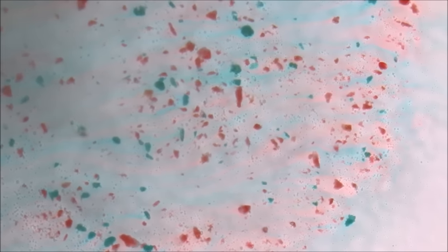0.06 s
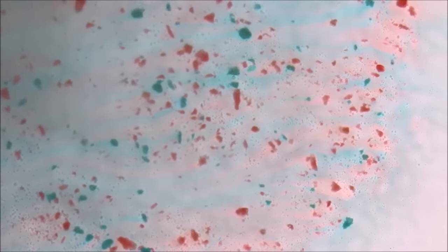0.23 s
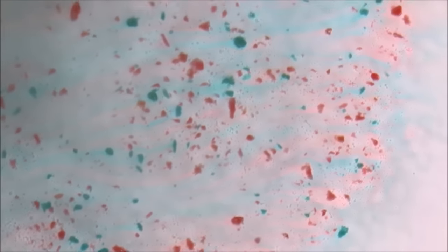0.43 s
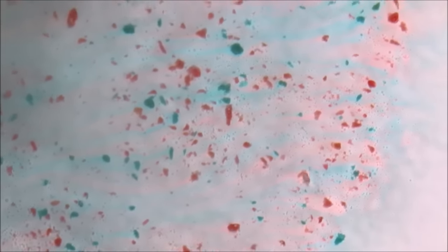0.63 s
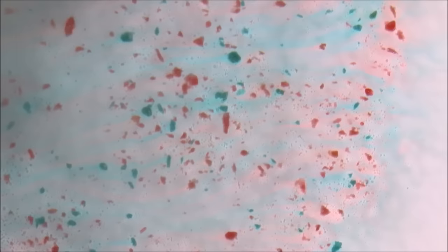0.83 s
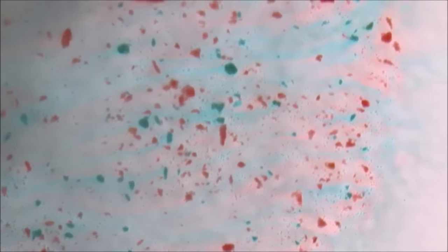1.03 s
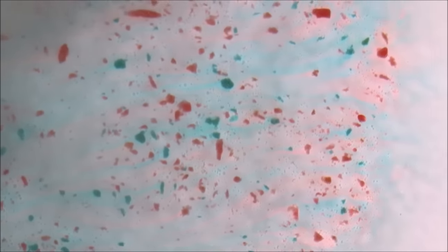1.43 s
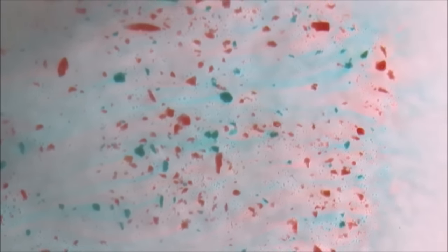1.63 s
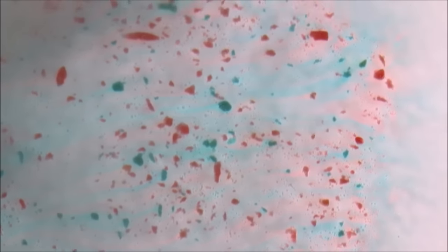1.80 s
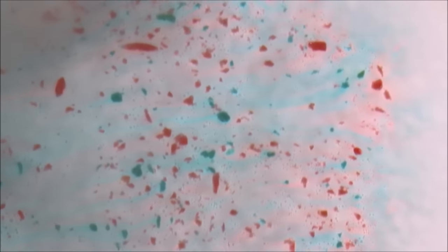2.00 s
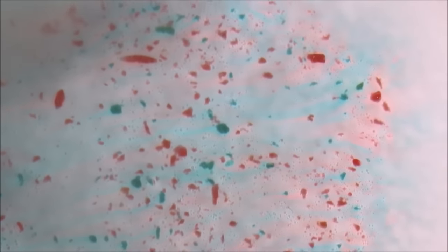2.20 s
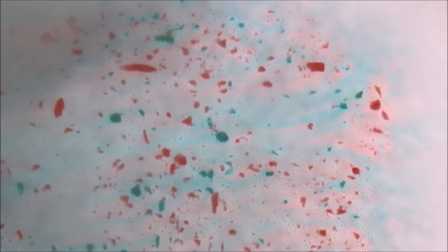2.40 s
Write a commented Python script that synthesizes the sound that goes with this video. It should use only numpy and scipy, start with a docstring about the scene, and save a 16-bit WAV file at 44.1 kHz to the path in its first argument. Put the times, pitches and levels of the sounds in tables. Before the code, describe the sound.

Granules crackle and pop as they dissolve in bath water, over a faint hiss.

```python
"""Crackling granules dissolve in a bathtub: each bursts with a snap and a brief ring of its freed gas
bubble. A few bursts are loud and close, many are small, and countless tiny pops make a fizz.
The tub walls throw every pop back at once and the tiled room rings on.
A faint hiss and a low hum lie underneath."""
import sys
import numpy as np
from scipy import signal
from scipy.fft import rfft, irfft, next_fast_len
from scipy.io import wavfile
from scipy.ndimage import map_coordinates

SR = 44100
rng = np.random.default_rng(int(sys.argv[2]) if len(sys.argv) > 2 else 0)


def dump(signal):
    """Clip the signal to [-1, 1] and save it as 16-bit WAV at the path in sys.argv[1]."""
    limited = np.clip(np.atleast_2d(signal).T, -1, 1)
    pcm = np.round(limited * 32767).astype(np.int16)
    wavfile.write(sys.argv[1], SR, pcm)


N = 112454
POP_SAMPLES = 16384  # room for one pop and its echoes
POP_HZ = np.fft.rfftfreq(POP_SAMPLES, 1 / SR)


def gain(db):
    """Turn decibels into a number to multiply by."""
    return 10 ** (np.asarray(db) / 20)


def unit(x):
    """Scale a sound to an average (rms) level of 1."""
    return x / np.sqrt(np.mean(x ** 2) + 1e-20)


def read_curve(points, hz):
    """Read between a table's rows, with frequency spaced in octaves."""
    row_hz, values = np.transpose(points)
    return np.interp(np.log(hz + 1), np.log(row_hz + 1), values)


# How alike left and right sound (1 = the same, 0 = unrelated): frequency_hz, likeness
EAR_LIKENESS = [(60, .95), (180, 0.65), (700, 0.65), (1400, 0.62), (2800, 0.073), (6000, 0.04),
                (14000, 0.026)]

def stereo(pair, hz):
    """Blend two unrelated spectra into left and right: alike in the bass, apart in the treble."""
    angle = np.arccos(read_curve(EAR_LIKENESS, hz)) / 2
    shared, apart = pair[0] * np.cos(angle), pair[1] * np.sin(angle)
    return np.array([shared + apart, shared - apart])


# Tone of the background hiss: frequency_hz, relative_level_db
HISS_TONE = [(25, -16.5), (45, 3), (60, 8.5), (110, 4), (140, 0), (250, -0.5), (500, -7), (1000, -6.5),
             (2000, -1.5), (4000, -5), (8000, -16), (16000, -22.5)]

def hiss(level_db=-49.5):
    """Steady, faint noise with some rumble at the bottom."""
    hz = np.fft.rfftfreq(N, 1 / SR)
    noise = stereo(rfft(rng.standard_normal((2, N))), hz)
    return gain(level_db) * unit(irfft(noise * gain(read_curve(HISS_TONE, hz)), N))


# The low tones of the hum: pitch_hz, level_db
HUM_TONES = [(57, -69.5), (86.5, -65), (108.5, -61.5), (167, -68)]

def hum(waver_depth=0.29, wavers_per_s=11):
    """A few low tones, each wavering at random in loudness and pitch."""
    t = np.arange(N) / SR
    out = np.zeros(N)
    for pitch_hz, level_db in HUM_TONES:
        swell, drift = (map_coordinates(steps, [t * wavers_per_s], mode="mirror")
                        for steps in rng.standard_normal((2, 128)))
        waver = 1 + waver_depth * (swell + 1j * drift)
        out += gain(level_db) * unit(np.real(waver * np.exp(2j * np.pi * pitch_hz * t)))
    return out


# Tone of a snap in the tub: frequency_hz, relative_level_db
SNAP_TONE = [(100, -42.5), (300, -15.5), (550, -12.5), (800, -5), (1450, 4), (2400, 4.5), (3600, -5),
             (6500, -12.5)]

def snap_spectrum():
    """The click of a bursting granule, with its energy packed at the very start (minimum phase)."""
    cepstrum = irfft(np.log(gain(read_curve(SNAP_TONE, POP_HZ))))
    # Fold the half before the click onto the half after it.
    cepstrum[1:POP_SAMPLES // 2] *= 2
    cepstrum[POP_SAMPLES // 2 + 1:] = 0
    return np.exp(rfft(cepstrum))


def pop(path, snap, pitch_hz, ring_db, snap_db, sharpness=4.4, snap_reach=2.24):
    """A snap and the dying ring of a wobbling bubble, heard along one echo path."""
    s = 1j * POP_HZ / pitch_hz  # frequency compared with the bubble's pitch
    below, above = (z / (1 + z / sharpness + z * z) for z in (s / 0.89, s / 1.11))  # two close tones
    ring = below * above / (1 + s / (2 * snap_reach))
    # The snap dulls above snap_reach times the pitch: larger bubbles burst more slowly.
    crack = snap / (1 + s / snap_reach)
    treble = 1j * POP_HZ / 7500
    crack /= 1 + np.sqrt(2) * treble + treble * treble  # soften above 7500 Hz
    sound = gain(snap_db) * unit(irfft(path * crack)) + gain(ring_db) * unit(irfft(path * ring))
    # Levels count as if all the pop's energy fell within 0.02 s.
    level = np.hypot(gain(ring_db), gain(snap_db)) * np.sqrt(0.02 * SR / POP_SAMPLES)
    return level * unit(sound)


def tub_echoes(count=40, spread_s=0.025, fade_60db_s=0.048, scatter_db=3.5):
    """The nearby tub walls throw back a quick cluster of uneven echoes."""
    delay_s = spread_s * (np.arange(count) + rng.uniform(0, 1, (2, count)) + 1) / count
    signs = np.sign(rng.standard_normal((2, count)))
    echo_db = scatter_db * rng.standard_normal((2, count)) - 60 * delay_s / fade_60db_s
    return np.array([np.bincount((times * SR).astype(int), strengths, POP_SAMPLES)
                     for times, strengths in zip(delay_s, signs * gain(echo_db))])


# How long the room takes to fade by 60 dB: frequency_hz, fade_s
ROOM_FADE = [(300, 0.43), (1000, 0.34), (2500, 0.26), (7000, 0.27), (15000, 0.064)]

def room_tail(rise_s=0.0054):
    """Echoes off the tiles blur into noise that builds quickly and lasts longest in the bass."""
    hz, frame_s, noise = signal.stft(rng.standard_normal((2, POP_SAMPLES)), SR, nperseg=256)
    fade = gain(-60 * frame_s / read_curve(ROOM_FADE, hz)[:, None])
    tail = signal.istft(noise * fade, SR)[1][:, :POP_SAMPLES]
    t = np.arange(POP_SAMPLES) / SR
    return tail * (1 - np.exp(-t / rise_s))


def echo_path(direct_db, tub_db=7, room_db=4.5):
    """Sound from one spot arrives straight, off the tub and off the room; the levels set the balance."""
    echoes = gain(tub_db) * unit(tub_echoes()) + gain(room_db) * unit(room_tail())
    ear_delay_s = rng.uniform(0, 0.00015, (2, 1))
    direct = gain(direct_db) * np.exp(-2j * np.pi * POP_HZ * ear_delay_s)
    return direct + stereo(rfft(echoes / np.sqrt(POP_SAMPLES)), POP_HZ)


def add(out, start_s, sound):
    """Mix one pop into out at its start time."""
    start = round(start_s * SR)
    out[:, start:start + POP_SAMPLES] += sound[:, :N - start]


# How the fizz swells and sinks: time_s, boost_db
FIZZ_SWELL = [(0, 1), (.15, 4), (.75, 3), (1.15, 0.5), (1.45, 5), (1.7, -2.5), (1.93, -1.5), (2.15, 1),
              (2.55, 5)]

def fizz(snap, pops_per_s=100, middle_hz=5740, range_octaves=0.66, scatter_db=0.5):
    """Tiny pops at random moments all over the water; smaller bubbles ring higher and weaker."""
    out = np.zeros((2, N))
    paths = [echo_path(direct_db=1.5) for _ in range(12)]
    for k, start_s in enumerate(rng.uniform(0, N / SR, int(pops_per_s * N / SR))):
        boost_db = np.interp(start_s, *np.transpose(FIZZ_SWELL))
        octaves = range_octaves * np.tanh(rng.standard_normal())
        ring_db = rng.normal(-60, scatter_db) + boost_db - octaves  # 1 dB weaker per octave up
        snap_db = rng.normal(-59, scatter_db) + boost_db
        add(out, start_s, pop(paths[k % len(paths)], snap, middle_hz * 2 ** octaves, ring_db, snap_db))
    return out


# Small pops (more direct_db means less echo): start_s, pitch_hz, ring_db, snap_db, direct_db
SMALL_POPS = [(0.047, 2950, -54, -47.5, -2), (0.059, 3170, -41.5, -56, -1), (0.078, 5570, -40, -42, -4),
              (0.1468, 7240, -43.5, -61, 11), (0.2064, 5200, -33, -43, 1), (0.2331, 5500, -59, -36.5, -7),
              (0.4259, 3030, -33.5, -34.5, 0), (0.4853, 3430, -34.5, -32, -2),
              (0.5926, 2270, -39, -33.5, -3), (.612, 6100, -44.5, -57, -2), (0.6882, 6500, -45.5, -45.5, 6),
              (0.801, 1840, -47.5, -39, -4), (0.8883, 6950, -53, -47.5, 4), (0.938, 8700, -57, -59, 12),
              (0.951, 3060, -49, -47.5, -8), (1.004, 4930, -40.5, -44.5, -9),
              (1.101, 6200, -39, -44.5, 9.5), (1.105, 1870, -57, -37, -4), (1.155, 1700, -53, -46.5, 13),
              (1.194, 3780, -48, -39, -1), (1.257, 2200, -51, -36, -6), (1.3865, 2930, -41, -40, -9),
              (1.3905, 2280, -39, -36.5, -3), (1.399, 2730, -43.5, -42, 3), (1.444, 1930, -51, -42, 0),
              (1.7512, 6700, -48, -46.5, -13), (1.826, 2590, -54, -46, -4),
              (1.9803, 3800, -43.5, -41.5, 4.5), (2.011, 2020, -46, -47.5, 1), (2.1023, 3160, -44, -38, -9),
              (2.144, 5300, -41.5, -40.5, -14), (2.331, 4400, -49.5, -53, -4),
              (2.381, 8600, -51.5, -53, -4), (2.416, 1650, -61, -46.5, -2), (2.519, 2530, -48.5, -48, -7)]

def small_pops(snap):
    """Single granules that stand out from the fizz, each bursting at its own spot."""
    out = np.zeros((2, N))
    for start_s, pitch_hz, ring_db, snap_db, direct_db in SMALL_POPS:
        add(out, start_s, pop(echo_path(direct_db), snap, pitch_hz, ring_db, snap_db))
    return out


# Loud bursts: start_s, pitch_hz, ring_db, snap_db, snap_reach (times the pitch), right_over_left_db
LOUD_BURSTS = [(0.3189, 2070, -18.5, -22, 1, -0.5), (1.5090, 2146, -21.5, -29.5, .4, 0.5),
               (2.2139, 2760, -23.5, -30, 1.8, 1.5), (2.2156, 1590, -32.5, -41, 1, 2),
               (2.2245, 2830, -35, -32, .7, -3)]

def loud_bursts(snap):
    """Granules bursting close by, each a little to the left or right."""
    out = np.zeros((2, N))
    for start_s, pitch_hz, ring_db, snap_db, snap_reach, right_over_left_db in LOUD_BURSTS:
        path = echo_path(direct_db=-1)
        burst = pop(path, snap, pitch_hz, ring_db, snap_db, sharpness=3.6, snap_reach=snap_reach)
        balance = gain([[-right_over_left_db / 2], [right_over_left_db / 2]])
        add(out, start_s, burst * balance)
    return out


def scene():
    """Bursts, pops and fizz over the quiet bathroom."""
    snap = snap_spectrum()
    return hiss() + hum() + loud_bursts(snap) + small_pops(snap) + fizz(snap)


def record(dry, top_hz=16000):
    """Cut away the very highest treble."""
    size = next_fast_len(N + POP_SAMPLES)
    kept = np.fft.rfftfreq(size, 1 / SR) < top_hz
    return irfft(rfft(dry, size) * kept, size)[:, :N]


dry = scene()
out = record(dry)
dump(out)
```